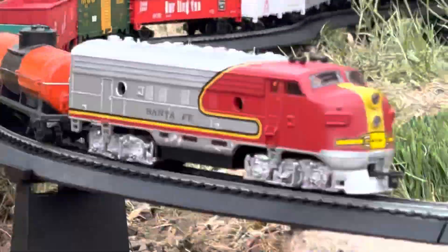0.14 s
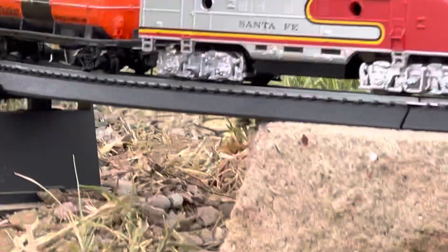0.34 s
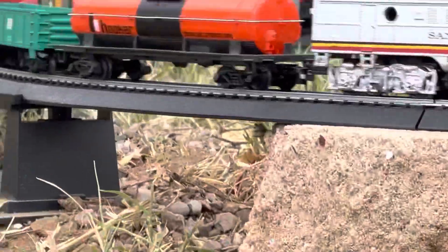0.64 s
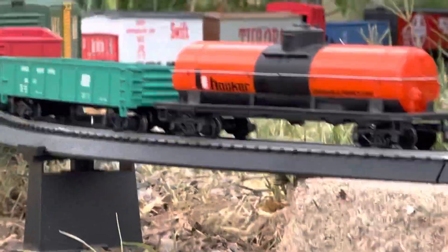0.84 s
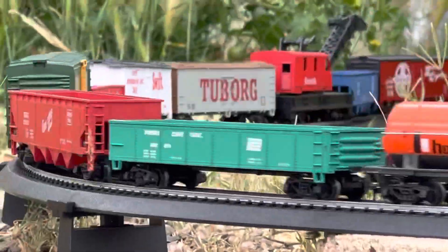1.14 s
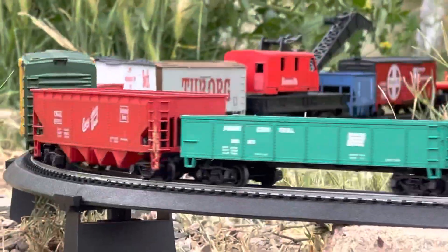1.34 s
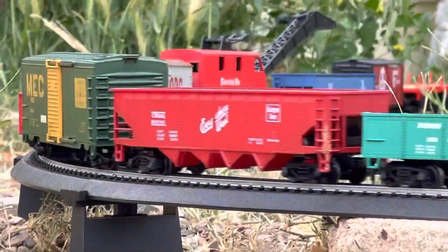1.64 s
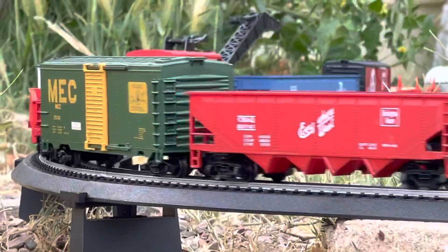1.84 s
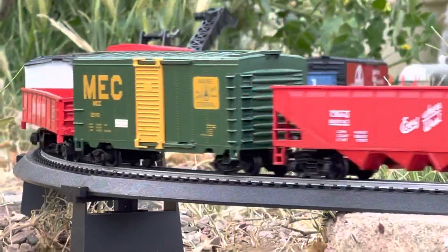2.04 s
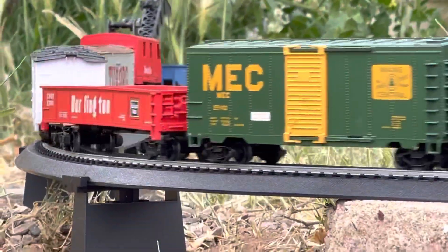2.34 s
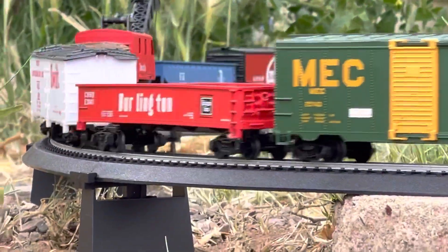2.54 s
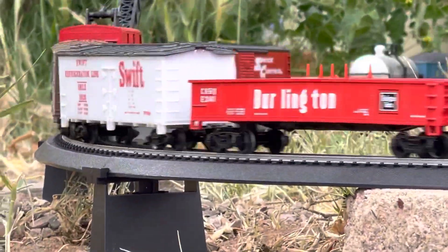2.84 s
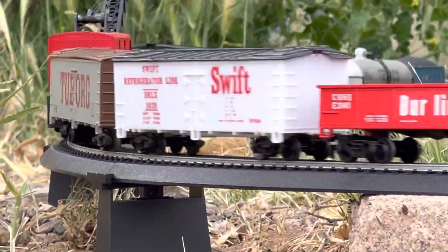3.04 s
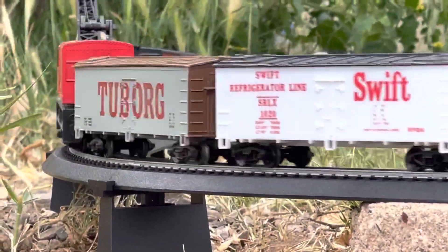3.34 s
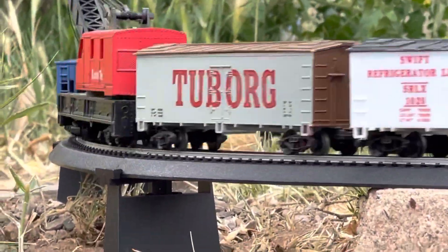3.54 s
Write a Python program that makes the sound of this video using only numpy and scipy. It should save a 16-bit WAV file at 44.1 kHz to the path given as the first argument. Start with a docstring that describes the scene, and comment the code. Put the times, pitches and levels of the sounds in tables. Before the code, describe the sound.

A model train rolls round a plastic track very close to the microphone outdoors, a continuous bright metallic hiss with dense tiny ticks, a few dry joint clicks and faint whines, over low wind buffets.

```python
"""A long model train rolls round a curve of plastic track in a garden, close to the microphone.
Its wheels hiss as shaped noise and tick as short decaying sines; each passing truck rings as a moving
resonance and whines as a gliding, unsteady tone, and rail joints crack as decaying bands of noise.
A light wind rumbles in the microphone as lumpy low noise and hits it with short buffets of slowing
sines and with low knocks, each a single pulse of pressure."""
import sys
import numpy as np
from scipy import signal
from scipy.fft import rfft, irfft
from scipy.io import wavfile
from scipy.ndimage import uniform_filter1d

SR = 44100
rng = np.random.default_rng(int(sys.argv[2]) if len(sys.argv) > 2 else 0)


def dump_mix(stems):
    """Bounce the given channels to the path in sys.argv[1] as a 16-bit WAV at rate SR."""
    frames = np.atleast_2d(stems).T  # one column per channel
    limited = np.clip(frames, -1, 1)  # hard clip at full scale
    pcm = np.round(limited * 32767).astype(np.int16)
    wavfile.write(sys.argv[1], SR, pcm)


N = 163170  # length in samples


def amp(db):
    """Decibel law: level to amplitude gain."""
    return 10 ** (np.asarray(db) / 20)


def unit(x):
    """Normalisation: scales to an rms of 1."""
    return x / np.sqrt(np.mean(x ** 2) + 1e-20)


def read(points, hz):
    """Interpolation on a logarithmic frequency axis."""
    f, value = np.transpose(points)
    return np.interp(np.log(hz + 1), np.log(f + 1), value)


def add(mix, s, sound):
    """Superposition: adds a sound to the mix from time s in seconds."""
    part = mix[:, max(round(s * SR), 0):][:, :sound.shape[-1]]
    part += sound[..., :part.shape[-1]]


def band(x, low_hz, high_hz, order=2):
    """Band-pass filtering with a Butterworth response."""
    high_hz = min(high_hz, SR / 2 - 1)
    return signal.sosfilt(signal.butter(order, [low_hz, high_hz], "band", fs=SR, output="sos"), x)


def low_noise(gain, count):
    """Spectral shaping: rows of white noise weighted by a gain at each frequency, at rms 1 overall."""
    return unit(irfft(rfft(rng.standard_normal((count, N))) * gain, N))


def patches(shape, size):
    """Random modulation: noise over (frames, bins), smoothed twice along each axis."""
    z = rng.standard_normal(shape)
    for axis in (0, 1, 0, 1):
        z = uniform_filter1d(z, size[axis], axis)
    return unit(z)


def passing(t, s, spread):
    """Passage of a source: a truck draws near, is closest at time s, and leaves."""
    return np.exp(-.5 * ((t - s) / spread) ** 2)


def ridge(hz, centre_hz, width):
    """Resonance curve: a bell over (frames, bins) whose centre may move."""
    return 1 / (1 + (2 * (hz - centre_hz[:, None]) / width) ** 2)


# Spectrum of wheels rolling on the rails. Each row: frequency in Hz, relative density in dB per Hz.
ROLL = [(100, -8.5), (600, -5), (850, -5.5), (1230, 1), (1400, -4), (1600, 0), (1950, 0), (2150, -4),
        (2600, -1.5), (3200, -2.5), (4000, 0), (4900, -3.5), (5450, -2), (5950, -5.5), (6500, -4),
        (6900, -4), (7450, -6.5), (7900, -5), (9100, -0.5), (9600, 0.5), (10000, 0.5), (10400, 7),
        (10750, 1.5), (11200, 6.5), (11700, 1), (12100, -7.5), (12700, -4.5), (13400, -23), (15400, -66),
        (16000, -47)]
# Changes of the hiss in time. Each row: time in seconds, then the middle, treble and top controls in dB.
ROLL_LEVELS = [(0, 0, 0.5, -2), (.35, -3.5, 3.5, -2.5), (.75, 1, 0, -2.5), (1.1, -0.5, 1, -11.5),
               (1.4, 0, 1.5, -9), (1.75, 2, 1.5, -1), (2.1, 3.5, 2.5, 5.5), (2.38, 0.5, 0.5, 12.5),
               (2.52, 1, 3, 8), (2.8, 4.5, 1, 4.5), (2.97, 2, 1.5, 0.5), (3.25, 2.5, 0.5, 4.5),
               (3.58, 3, -4, 1), (3.7, 2, -3, -3)]
# Frequencies in Hz at which the shares of the three controls are set.
BAND_CENTRES_HZ = [1200, 2700, 4600, 5600, 9200, 10100]


def hiss_level(t, hz):
    """Roughness excitation: the rolling spectrum in dB, with three controls that vary in time."""
    level = read(ROLL, hz) + np.zeros((len(t), len(hz)))
    times, *controls = np.transpose(ROLL_LEVELS)
    shares = [(0, 0.9, 0.65, 0, 0.19, 0.12),  # middle
              (0, 0, 0.44, 0.8, 0.77, 0),  # treble
              (0, 0, 0, 0, 0, 0.53)]  # top
    for control, share in zip(controls, shares):
        level += np.outer(np.interp(t, times, control), np.interp(hz, BAND_CENTRES_HZ, share))
    return level


# Trucks ringing as they pass. Each row: loudest moment in seconds, spread in seconds, pitch in Hz,
# glide in Hz per second, width in Hz, boost over the hiss in dB.
RINGS = [(.1, 0.079, 7100, -13, 220, 7.5), (.2, 0.23, 11250, 0, 450, 5.5), (.2, 0.09, 12700, 0, 300, 14),
         (.3, 0.16, 5820, 2, 400, 7), (.67, 0.19, 1550, 0, 140, 8), (.54, .12, 12000, 1500, 400, 13.5),
         (1.16, 0.1, 2800, -1500, 300, 7.5), (1.3, 0.33, 7830, -400, 350, 9.5),
         (1.15, 0.35, 8200, -400, 450, 9), (1.5, .3, 9950, -2, 230, -4), (1.52, 0.065, 3200, 3494, 218, 8),
         (1.68, 0.17, 4040, -2, 150, 8.5), (1.72, 0.09, 9200, 0, 400, 7.5),
         (2.07, 0.086, 8860, 0, 400, 9.5), (2.05, 0.25, 5375, 0, 220, 7),
         (2.3, 0.087, 6300, -400, 330, 10.5), (2.3, 0.46, 10000, 0, 354, 9.5),
         (2.55, .1, 4150, 0, 450, 5.5), (2.72, 0.038, 2490, 0, 160, 6), (2.87, .05, 2560, 0, 283, 8),
         (3.33, .06, 3960, -1500, 180.6, 7.5)]


def truck_rings(t, hz):
    """Local resonance: each passing truck lifts the hiss around a pitch of its own."""
    boost = np.zeros((len(t), len(hz)))
    for s, spread, ring_hz, glide, width, db in RINGS:
        boost += db * passing(t, s, spread)[:, None] * ridge(hz, ring_hz + glide * (t - s), width)
    return boost


# Lasting resonance of wheels and rail. Each row: time in seconds, centre in Hz.
RAIL_RING = [(0, 7050), (.55, 7260), (.9, 6850), (1.4, 6780), (1.75, 6400), (2.2, 6610), (2.7, 6630),
             (3.15, 6660), (3.7, 6500)]
RAIL_RING_WIDTH_HZ, RAIL_RING_DB = 500, 7.5


def rail_ring(t, hz):
    """Coupled resonance: a lasting ring of wheels and rail drifts as the wagons go by."""
    centre_hz = np.interp(t, *np.transpose(RAIL_RING))
    return RAIL_RING_DB * ridge(hz, centre_hz, RAIL_RING_WIDTH_HZ)


# Likeness of the two microphone ports. Each row: frequency in Hz, coherence from 0 to 1.
SAME = [(100, 0.84), (600, 0.62), (850, 0.48), (1200, 0.65), (2000, 1), (3500, 0.95), (7000, 0.96),
        (9400, 0.97), (10400, 1), (12000, 0.88), (13000, 0.47)]
# Phase by which the left port leads the right. Each row: frequency in Hz, phase in radians.
PHASE_LEAD = [(500, 0), (1000, -.65), (1450, -.45), (1900, 0), (2600, 0), (3200, -.3), (4600, -.27),
              (5450, -.52), (6400, -.05), (7450, -.1), (7900, -.75), (8800, 0), (9300, 1.5), (9700, 2.4),
              (10350, 3.14), (11000, 4.4), (11750, 6.28), (12350, 6.28), (13200, 9.3)]
ROLL_DB = -37  # rms level
PATCH_DB, PATCH_SLOW_DB, FLUTTER_DB = 1.13, 1.5, 0.31  # rms depths of the random modulation


def rolling(size=512):
    """Structure-borne noise: wheel roughness hisses through rails and wagons, coloured by resonance."""
    hop = size // 4
    hz, t = np.fft.rfftfreq(size, 1 / SR), np.arange(N // hop + 8) * hop / SR
    shape = (len(t), len(hz))
    level = hiss_level(t, hz) + truck_rings(t, hz) + rail_ring(t, hz)
    level += PATCH_DB * patches(shape, size=(9, 6))
    level += PATCH_SLOW_DB * patches(shape, size=(50, 1))
    level += FLUTTER_DB * patches(shape, size=(6, 120))
    a, b, c, d = rng.standard_normal((4, *shape))
    left, other = a + 1j * b, c + 1j * d
    same = np.clip(read(SAME, hz), 0, 1)
    # mixing in independent noise lowers the coherence but keeps the power
    right = same * left + np.sqrt(1 - same ** 2) * other
    right = right * np.exp(-1j * read(PHASE_LEAD, hz))
    spectra = np.array([left, right]) * amp(level)
    _, hiss = signal.istft(spectra.transpose(0, 2, 1), nperseg=size, noverlap=size - hop)
    return amp(ROLL_DB) * unit(hiss[:, :N])


TICKS_PER_S, TICKS_DB, TICK_SPREAD_DB, TICK_DECAY_S = 260, -54.5, 2.5, 0.00087  # mean rate, rms level
TICK_TOP_HZ = 10600


def wheel_ticks(low_hz=1100, high_hz=9000, count=24):
    """Impulse response: grit and flanges tick at random, each tick a short ring of one small part."""
    t, out = np.arange(SR // 50) / SR, np.zeros(N)
    strength = amp(TICK_SPREAD_DB * np.minimum(rng.exponential(1, N), 4))
    hits = (rng.random(N) < TICKS_PER_S / SR) * strength
    part = rng.integers(0, count, N)
    for k, hz in enumerate(np.geomspace(low_hz, high_hz, count)):
        ring = np.sin(2 * np.pi * hz * t) * np.exp(-t / TICK_DECAY_S)
        out += signal.oaconvolve(hits * (part == k), ring)[:N]
    return amp(TICKS_DB) * unit(band(out, low_hz / 2, TICK_TOP_HZ, order=6))


WIND_SIDE = 0.27  # gain of the part that differs between the ports


def ports(mid, side):
    """Mid-side pairing: wind reaches the two ports almost alike."""
    return np.array([mid + WIND_SIDE * side, mid - WIND_SIDE * side])


# Spectrum of the wind rumble. Each row: frequency in Hz, relative density in dB per Hz.
RUMBLE = [(15, -32), (30, -29), (50, 0.5), (75, 4), (110, -3), (170, -6.5), (250, -15.5), (400, -25.5),
          (700, -52), (1500, -43)]
# Strength of the wind. Each row: time in seconds, level in dB.
RUMBLE_LEVEL = [(0, -27), (.1, -40), (.38, -41.5), (0.439, -45.5), (.5, -41), (.8, -43), (1.1, -47.5),
                (1.28, -43), (1.47, -45.5), (1.677, -38), (1.82, -46), (1.93, -42.5), (2.3, -41),
                (2.6, -45), (2.92, -47), (3.16, -40), (3.32, -48), (3.42, -38), (3.58, -43.5), (3.7, -47)]
LUMPS_HZ, LUMPS_DB = 16, 2  # upper edge and rms depth of the level's random lumps


def rumble():
    """Turbulence noise: a low, lumpy roar follows the strength of the wind."""
    hz, t = np.fft.rfftfreq(N, 1 / SR), np.arange(N) / SR
    mid, side = low_noise(amp(read(RUMBLE, hz)), 2)
    lumps = low_noise(hz < LUMPS_HZ, 1)[0]
    strength = amp(np.interp(t, *np.transpose(RUMBLE_LEVEL)))
    return ports(mid, side) * unit(amp(LUMPS_DB * lumps)) * strength


BUFFET_RISE_S, BUFFET_FADE_S, BUFFET_SLOWING, BUFFET_LOW_HZ = 0.0022, 0.0047, 0.55, 64.7


def eddy(t, length, edge_hz, count=16):
    """Vortex decay: a swirl of pressure starts fast, slows down and dies."""
    speed = np.exp(-BUFFET_SLOWING * np.minimum(t / length - .5, 1))
    hz = np.geomspace(BUFFET_LOW_HZ, edge_hz, count)[:, None]  # scaled by the speed
    cycles = hz * np.cumsum(speed) / SR + rng.random((count, 1))
    swirl = np.sin(2 * np.pi * cycles).sum(0)
    rise = np.sin(np.pi / 2 * np.minimum(t / BUFFET_RISE_S, 1)) ** 2
    fade = np.exp(-np.maximum(t - length, 0) / BUFFET_FADE_S)
    puff = band(swirl * rise * fade, 37, 2 * edge_hz)
    return puff / np.sqrt(np.sum(puff ** 2) / (length * SR))  # energy set by the length


# Wind buffets on the microphone. Each row: start in seconds, length in seconds,
# level in dB before the common trim, upper edge in Hz before the common stretch.
BUFFETS = [(0, 0.012, -23, 532), (0.016, 0.044, -32, 332), (0.116, 0.013, -34.5, 324),
           (0.152, 0.021, -34.5, 172), (0.212, 0.017, -35, 363), (0.228, 0.016, -32, 338),
           (0.248, 0.018, -36, 151), (0.339, 0.05, -42, 198), (0.517, 0.02, -39, 222),
           (0.576, 0.014, -38.5, 139), (0.687, 0.028, -32.5, 251), (0.836, 0.036, -37.5, 196),
           (0.902, 0.023, -28, 306), (1.165, 0.016, -34.5, 374), (1.385, 0.016, -35, 110),
           (1.59, 0.017, -38, 292), (1.661, 0.036, -34.5, 221), (1.716, 0.028, -34, 293),
           (1.744, 0.015, -29, 369), (1.863, 0.0067, -26.5, 383), (1.871, 0.022, -29.5, 298),
           (1.893, 0.033, -33.5, 157), (1.98, 0.024, -38, 213), (2.014, 0.012, -29, 360),
           (2.029, 0.037, -38, 223), (2.149, 0.016, -36, 250), (2.215, 0.032, -38, 149.2),
           (2.327, 0.031, -39.5, 235), (2.391, 0.01, -34.5, 349), (2.649, 0.02, -34.5, 244),
           (3.025, 0.013, -31, 203), (3.106, 0.014, -37, 240), (3.135, 0.034, -39, 186),
           (3.471, 0.016, -37.5, 179), (3.627, 0.012, -28.5, 339), (3.65, 0.023, -30.5, 405),
           (3.682, 0.012, -29, 320)]
BUFFET_DB = -1  # common trim


def buffets(edge_stretch=1.1):
    """Pressure fluctuation: eddies thump the microphone in loose clusters."""
    t, out = np.arange(SR // 10) / SR, np.zeros((2, N))
    for s, length, db, edge_hz in BUFFETS:
        mid, side = (eddy(t, length, edge_stretch * edge_hz) for _ in range(2))
        add(out, s - BUFFET_RISE_S / 2, amp(db + BUFFET_DB) * ports(mid, side))
    return out


# Low knocks among the buffets. Each row: peak moment in seconds,
# level in dB before the port gains, centre in Hz.
KNOCKS = [(.021, -28, 350), (.048, -23, 303), (.169, -33, 120), (.213, -34, 340), (.239, -24.5, 290),
          (0.264, -41, 220), (.343, -34, 298.5), (.354, -25.5, 110), (.381, -30, 156), (.477, -31, 150),
          (.523, -34, 289), (.585, -31, 140), (.697, -23, 180), (.865, -29, 119), (.91, -25, 323),
          (1.168, -31.5, 330), (1.171, -39.5, 160), (1.687, -27.5, 199.7), (1.694, -32, 330),
          (1.747, -25, 340), (1.865, -26, 383), (1.877, -25, 330), (1.887, -24.5, 400), (1.899, -34, 400),
          (2.02, -21, 272), (2.154, -36, 230), (2.233, -38, 110), (2.316, -33, 219), (2.334, -33, 278),
          (2.398, -26, 200), (2.576, -39, 228), (3.026, -27.5, 497), (3.041, -29.5, 330),
          (3.152, -30.5, 212), (3.524, -32, 217), (3.665, -24.5, 374)]


def knocks():
    """Pressure pulse: single hard pushes thud without ringing."""
    t, out = np.arange(-SR // 100, SR // 100) / SR, np.zeros((2, N))
    for s, db, hz in KNOCKS:
        u = (np.pi * hz * t) ** 2
        pulse = (1 - 2 * u) * np.exp(-u)  # one peak between two shallow dips
        port_gains = ports(0.72, rng.uniform(-1.1, 1))[:, None]
        add(out, s + t[0], amp(db) * port_gains * pulse)
    return out


# Wheels striking rail joints. Each row: start in seconds, level in dB before the decay, centre in Hz.
CLICKS = [(.119, -30.5, 6460), (.668, -30, 2240), (.771, -35, 3500), (1.021, -31, 1990), (1.061, -36, 6000),
          (2.156, -33, 6000), (2.865, -33, 2500)]
CLICK_DECAY_S, CLICK_SPAN = 0.0023, 1.7  # span: ratio of each band edge to the centre


def joint_clicks():
    """Impact noise: a short dry crack where a wheel crosses a joint."""
    t, out = np.arange(SR // 50) / SR, np.zeros((2, N))
    for s, db, hz in CLICKS:
        crack = unit(band(rng.standard_normal(len(t)), hz / CLICK_SPAN, hz * CLICK_SPAN, order=6))
        add(out, s, amp(db) * np.exp(-t / CLICK_DECAY_S) * crack)
    return out


# Wheel flanges whining in the curve. Each row: loudest moment in seconds, spread in seconds,
# pitch in Hz, glide in Hz per second, rms level in dB before the swell of the passage.
WHINES = [(1.59, .055, 3760, 1901, -50), (1.732, 0.058, 3950, 700.5, -49), (2.011, 0.062, 3650, -250, -50),
          (2.84, .07, 3965, 599.5, -47), (3.21, 0.074, 4168, 81, -50)]
WHINE_UNSTEADY_HZ, WHINE_WAVER_HZ, WHINE_FLUTTER_DB = 40, 15, 2.5  # bandwidth, rms depths


def wheel_whines():
    """Frictional self-excitation: flanges rub the curved rail and sing thin, unsteady, gliding tones."""
    t, out = np.arange(N) / SR, np.zeros(N)
    smooth = np.exp(-.5 * (np.fft.rfftfreq(N, 1 / SR) / WHINE_UNSTEADY_HZ) ** 2)
    for s, spread, hz, glide, db in WHINES:
        waver, grip = low_noise(smooth, 2)
        pitch = hz + glide * np.clip(t - s, -2 * spread, 2 * spread) + WHINE_WAVER_HZ * waver
        tone = np.sin(2 * np.pi * np.cumsum(pitch) / SR)
        out += amp(db) * passing(t, s, spread) * unit(amp(WHINE_FLUTTER_DB * grip) * tone)
    return out


def scene():
    """Superposition of the train and the wind."""
    train = rolling() + wheel_ticks() + joint_clicks() + wheel_whines()
    wind = rumble() + buffets() + knocks()
    return train + wind


CUT_OFF_HZ = 15750


def record(dry):
    """Band limitation: a linear-phase low-pass filter removes the highest treble."""
    low_pass = signal.firwin(511, CUT_OFF_HZ, window=("kaiser", 9), fs=SR)
    return signal.oaconvolve(dry, low_pass[None], "same")


dry = scene()
out = record(dry)
dump_mix(out)
```